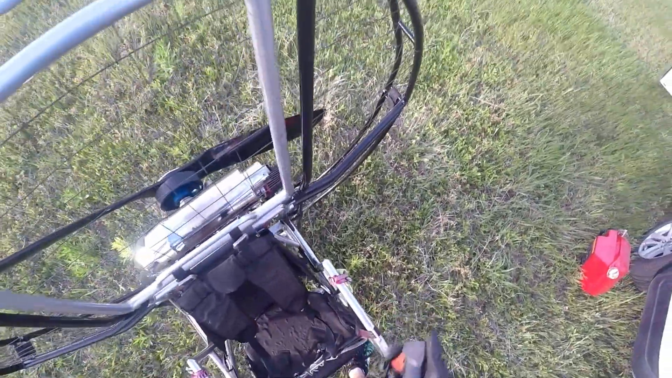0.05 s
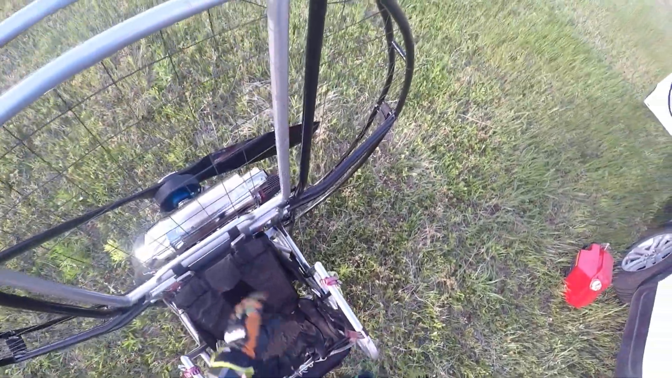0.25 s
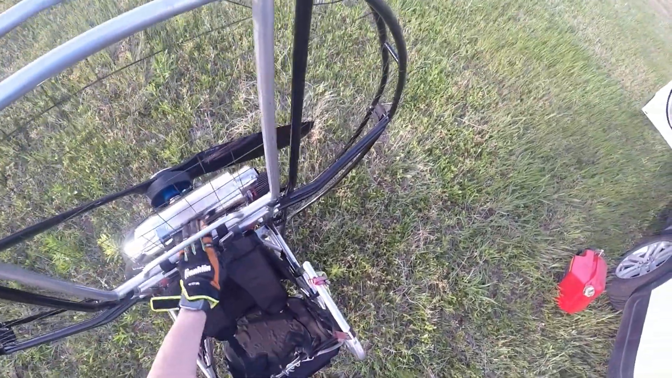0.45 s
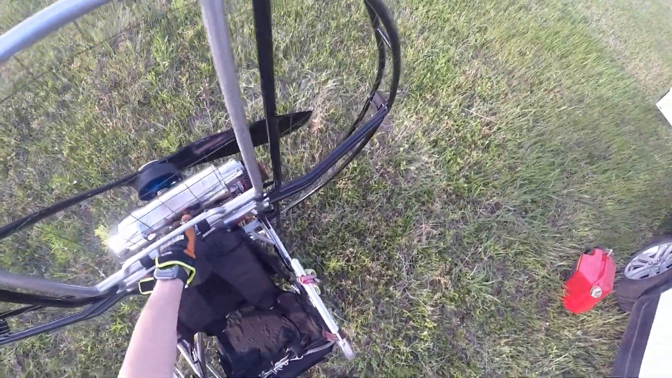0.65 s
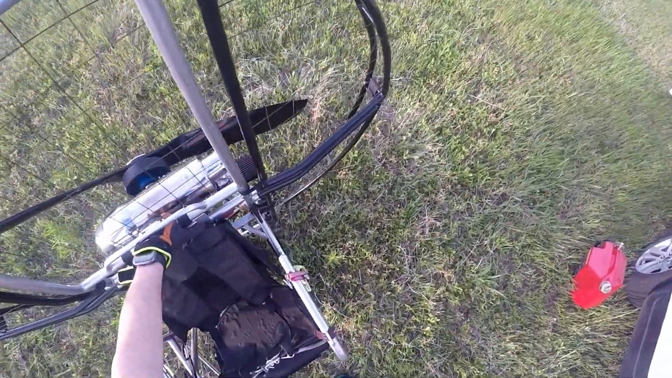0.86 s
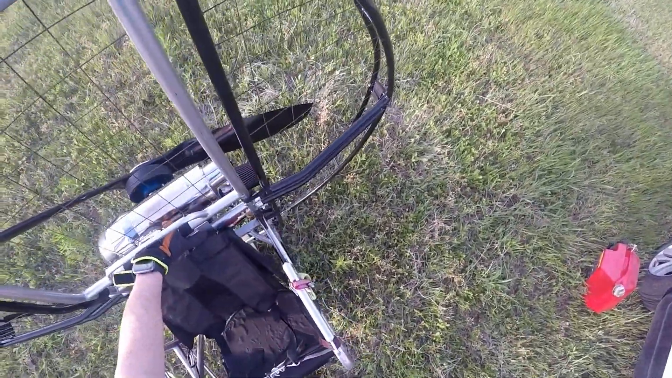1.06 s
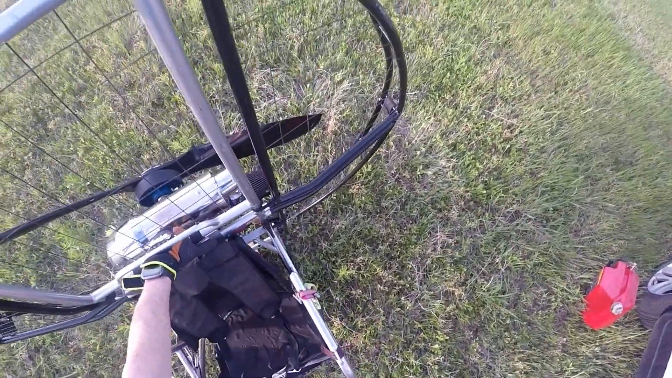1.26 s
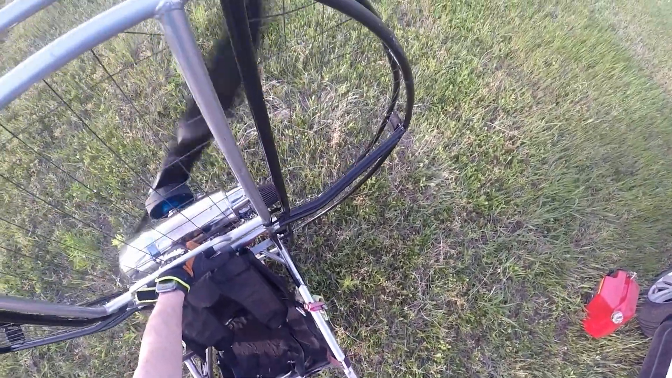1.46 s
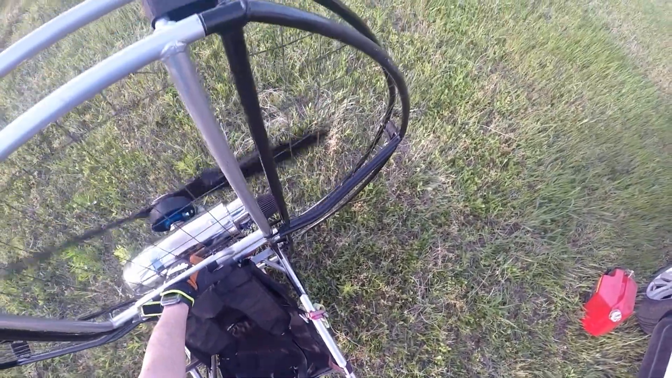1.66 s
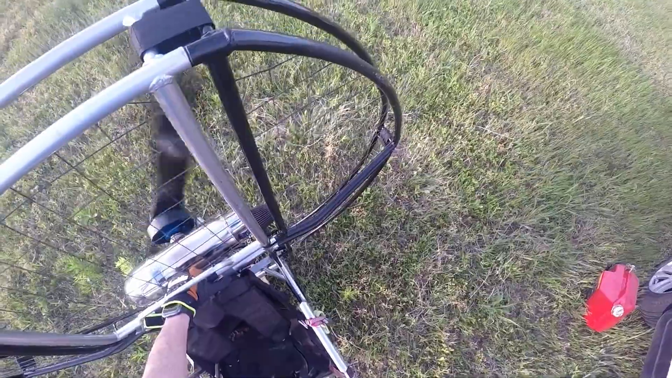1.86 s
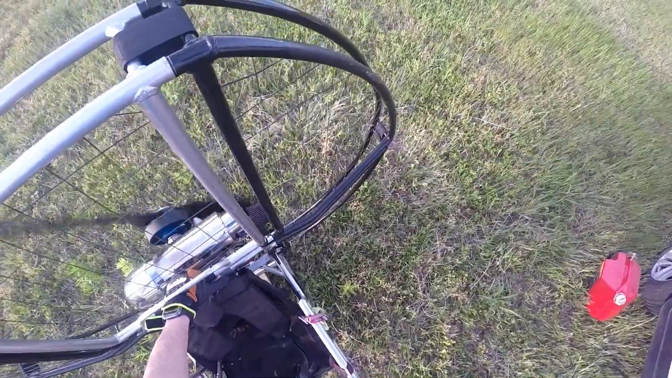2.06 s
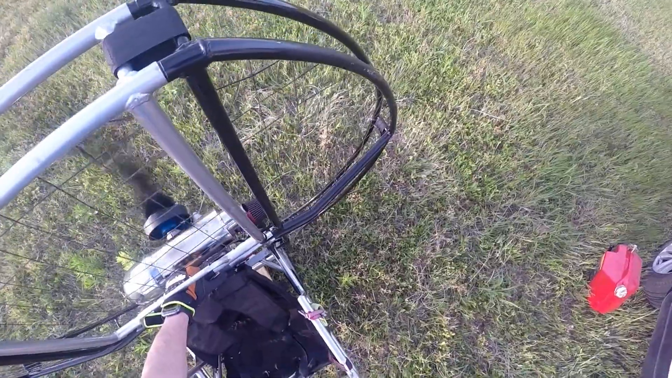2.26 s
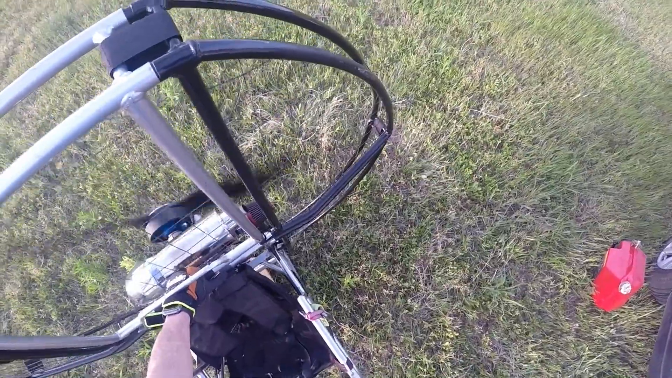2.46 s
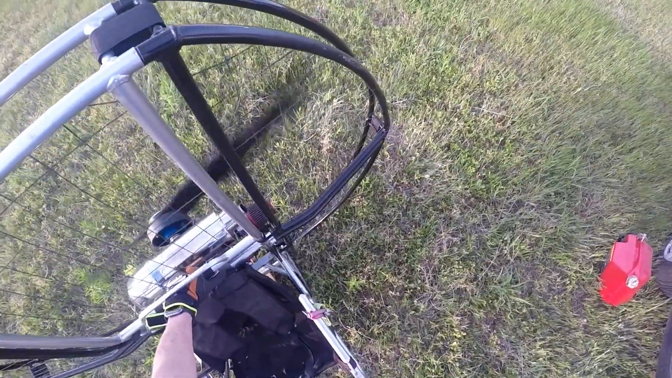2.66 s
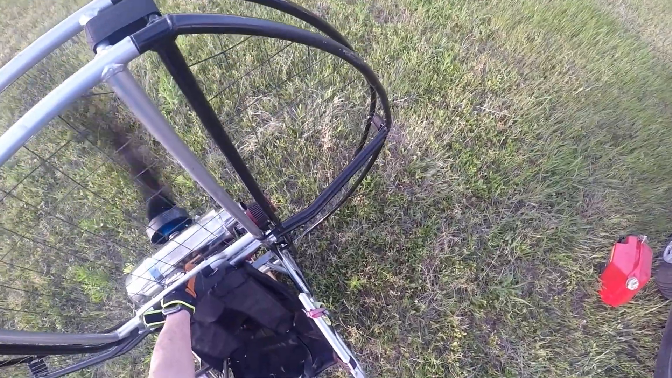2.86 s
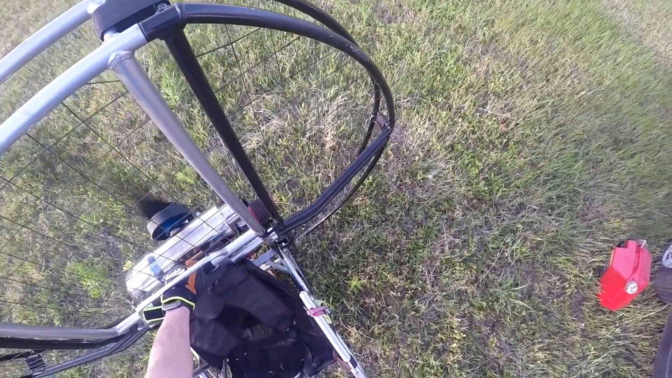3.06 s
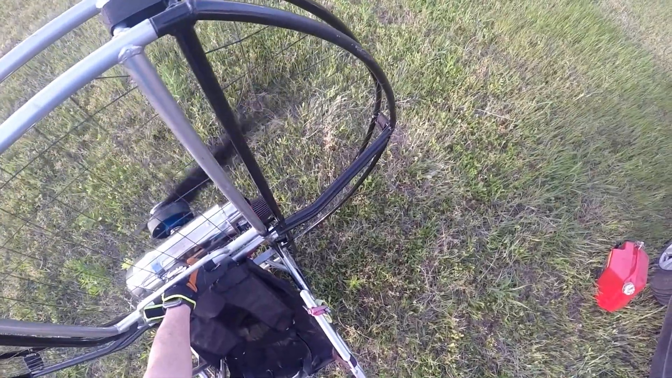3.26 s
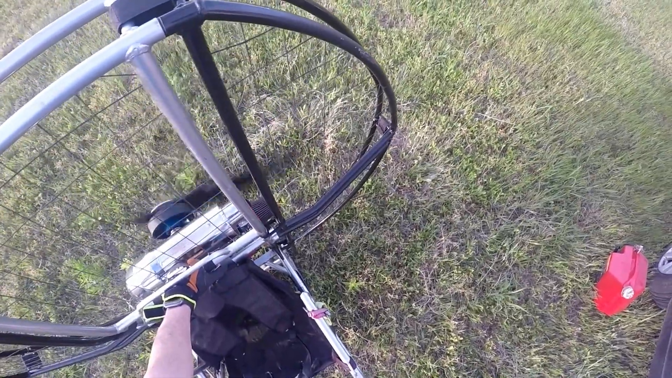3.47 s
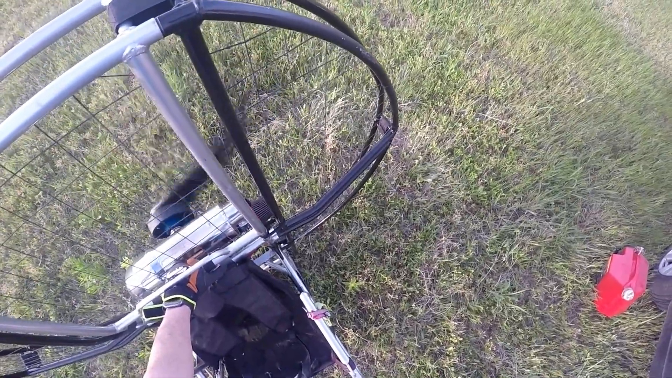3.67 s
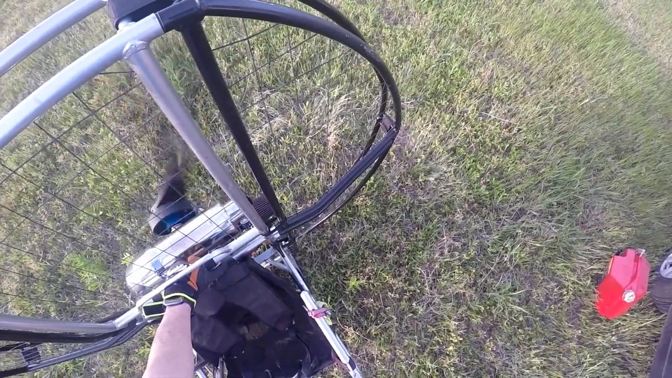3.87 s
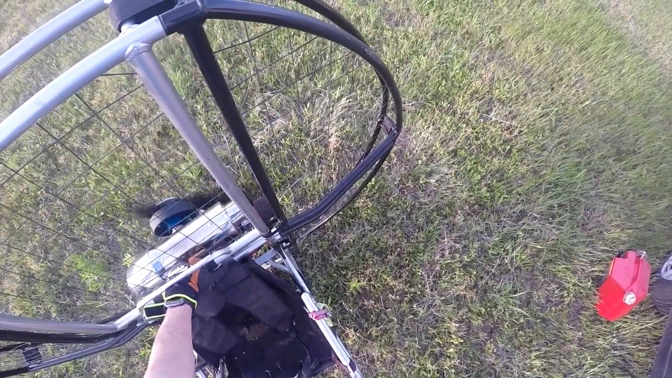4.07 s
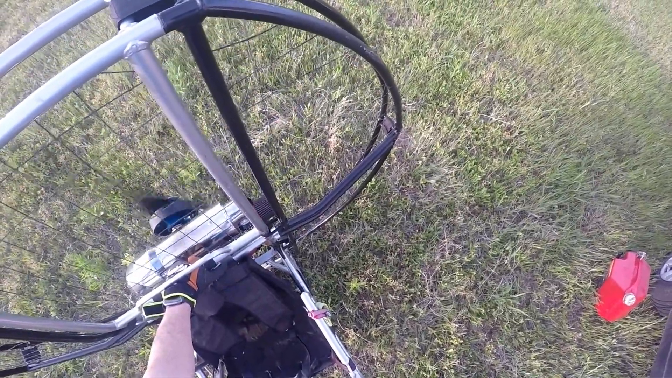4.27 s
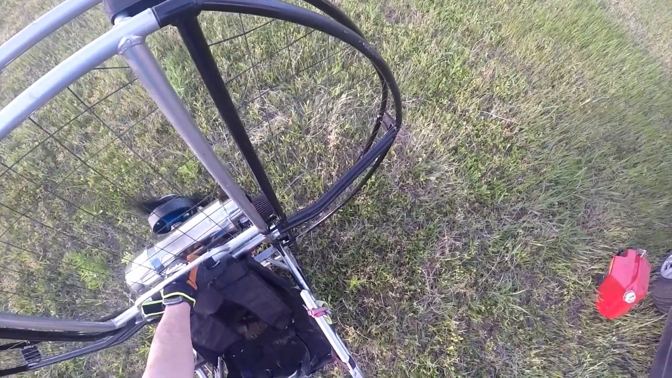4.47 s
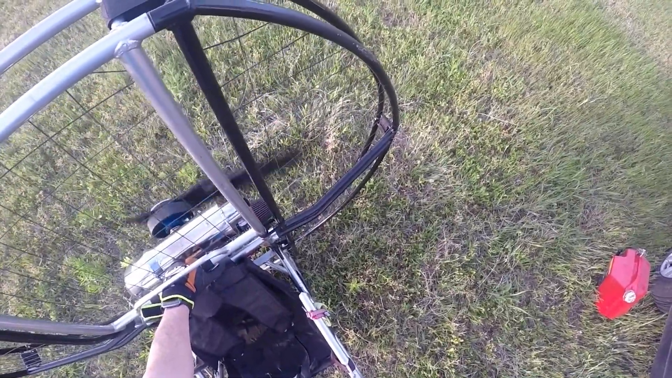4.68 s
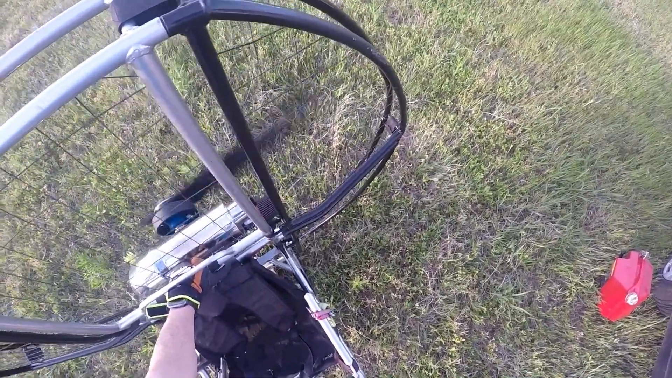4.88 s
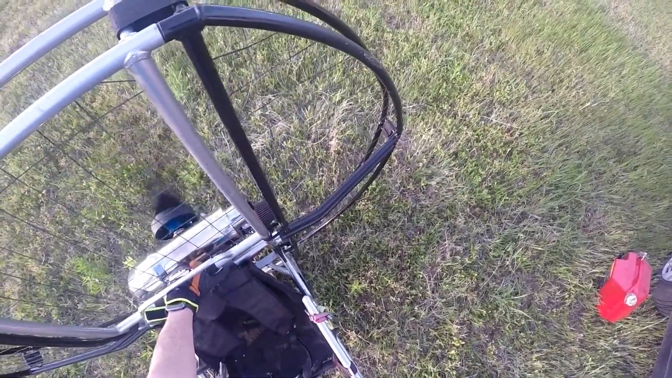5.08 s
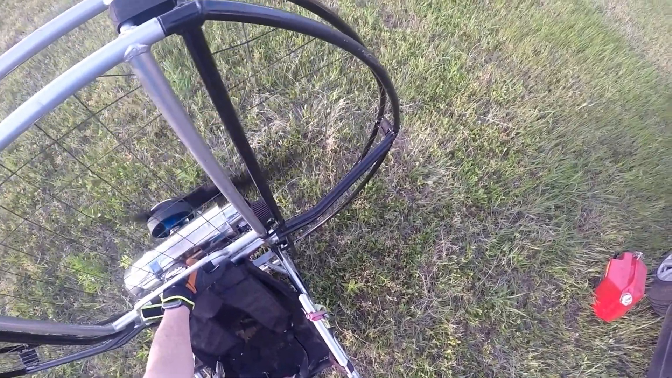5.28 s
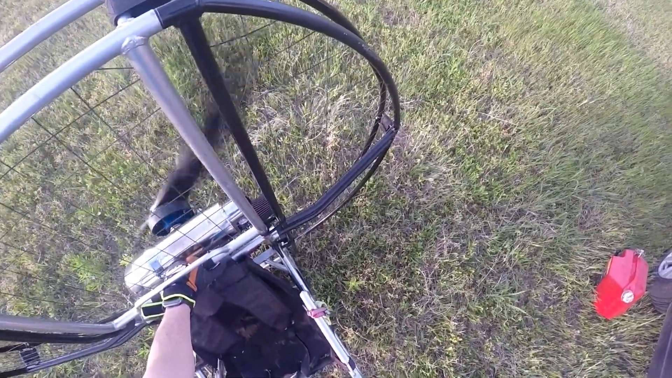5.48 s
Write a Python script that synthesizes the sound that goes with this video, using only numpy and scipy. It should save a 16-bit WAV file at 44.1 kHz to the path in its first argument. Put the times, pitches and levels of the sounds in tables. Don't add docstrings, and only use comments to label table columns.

```python
import sys
import numpy as np
from scipy import signal
from scipy.fft import rfft, irfft
from scipy.io import wavfile
from scipy.ndimage import uniform_filter1d

SR = 44100
rng = np.random.default_rng(int(sys.argv[2]) if len(sys.argv) > 2 else 0)


def volts_from_db(level):
    exponent = np.asarray(level, float) / 20
    return 10 ** exponent


def generate_wav(sig):
    pcm = np.round(np.clip(np.atleast_2d(sig).T, -1, 1) * 32767).astype(np.int16)
    wavfile.write(sys.argv[1], SR, pcm)


N = 243873
T = np.arange(N) / SR
CATCH_S, RELEASE_S = 2.28, 4.5


def unit(x):
    return x / np.sqrt(np.mean(x ** 2))


def white():
    return rng.standard_normal(N)


def wander(samples):
    return unit(uniform_filter1d(white(), size=samples))


def bump(centre_s, half_s):
    return np.exp(-((T - centre_s) / half_s) ** 2)


def curves(table):
    s, *columns = np.transpose(table)
    return [np.interp(T, s, c) for c in columns]


def butter(x, order, hz, kind="low"):
    return signal.sosfilt(signal.butter(order, hz, kind, fs=SR, output="sos"), x)


def ring(x, hz, width_hz):
    return signal.lfilter(*signal.iirpeak(hz, hz / width_hz, SR), x)


def body(x, spectrum, modes=(), under_db=-6):
    hz = np.maximum(np.arange(4097) * SR / 8192, 1)
    at, db = np.transpose(spectrum)
    power = volts_from_db(np.interp(np.log(hz), np.log(at), db) + under_db) ** 2
    for f, width, top_db in modes:
        power = power + volts_from_db(top_db) ** 2 / (1 + (2 * (hz - f) / width) ** 2) ** 2.15
    ceps = irfft(np.log(power) / 2)
    ceps[1:4096] *= 2
    ceps[4097:] = 0
    taps = irfft(np.exp(rfft(ceps)))
    return signal.fftconvolve(x, unit(taps) / np.sqrt(len(taps)))[:N]


def spikes(times, size):
    out = np.zeros(N)
    np.add.at(out, np.clip((np.asarray(times) * SR).astype(int), 0, N - 1), size)
    return out


def fade(x, decay_s, rise_s):
    t = T[:8192]
    return signal.fftconvolve(x, (1 - np.exp(-t / rise_s)) * np.exp(-t / decay_s))[:N]


def grit(rate, spread_db, smear_s):
    size = volts_from_db(spread_db * np.minimum(rng.exponential(size=N), 4.0))
    hits = (rng.random(N) < rate / SR) * size
    return unit(white() * (0.64 + unit(fade(hits, smear_s, 0.00057))))


# time in seconds, speed in turns per second.
SPEED = [(0, 8), (1.6, 9.5), (2.25, 14), (2.3, 20), (3.0, 21), (3.2, 24), (3.35, 29), (3.65, 36),
         (3.95, 37), (4.21, 35), (4.45, 26.5), (4.54, 31.8), (4.84, 24), (4.9, 31), (5.05, 32), (5.21, 40),
         (5.45, 30.7), (5.53, 28.7)]


def crank(fired_s):
    free = np.cumsum(curves(SPEED)[0]) / SR
    at = np.interp(np.sort(fired_s), T, free)
    whole = np.concatenate([[0], np.cumsum(np.round(np.diff(at)))])
    return free + uniform_filter1d(np.interp(free, at, whole - at), size=2000)


def each_turn(turns, offset, scatter_db):
    wraps = np.diff(np.floor(turns - offset), prepend=0) > 0
    return wraps * volts_from_db(scatter_db * white())


# frequency in Hz, level in dB per Hz.
WIND = [(7.1, -38), (12, 2.5), (22, -7.5), (35, -3), (45, -3.5), (54, -11.5), (81, -25), (90, -13.5),
        (120, -61), (200, -120)]
# frequency in Hz, level in dB per Hz.
HISS = [(53, -15.5), (90, -4.5), (168, -11), (264, -16.5), (964, -23.5), (2440, -22), (3370, -25),
        (4090, -23.5), (6570, -31), (7810, -31), (14300, -36.5), (15600, -40)]
# time in seconds, level in dB above the steady rumble.
GUSTS = [(.09, 9), (.17, 5), (.46, 0), (.61, 6), (.74, 5), (.89, 3), (1.02, 0), (1.2, 3), (1.37, 2),
         (1.63, 9.5), (1.99, 9), (2.35, 4.5), (2.48, 7), (2.651, 9), (3.0, 5), (3.3, 7), (3.73, 2),
         (3.8, 8), (3.88, 3), (3.96, 2), (4.22, 7), (4.91, 2), (5.01, -2), (5.22, 8.5), (5.32, 3)]
# time in seconds, level in dB, pitch in Hz.
TICKS = [
    (0.086, -58.5, 2720),
    (.21, -64, 3500),
    (.3, -64, 2040),
    (1.26, -68, 2300),
    (0.564, -69, 181),
    (1.075, -62, 158),
    (2.02, -46.5, 124),
]
WIND_DB, SHAKE_DB_PER_TURN, GUST_HALF_S, HISS_DB = -48, 0.4784, 0.03, -62


def field(extra_speed):
    wind = unit(body(white(), WIND))
    steady = uniform_filter1d(np.abs(wind), size=4000) ** 0.78
    gusts_db = sum(db * bump(s, GUST_HALF_S) for s, db in GUSTS)
    rumble_db = WIND_DB + SHAKE_DB_PER_TURN * (extra_speed - extra_speed[0]) + gusts_db
    ticks = 0
    for s, db, hz in TICKS:
        push = spikes([s], 1.0) * 3000 / hz ** 0.83
        ticks = ticks + volts_from_db(db + 26) * ring(push, hz, hz / 6)
    return unit(wind / steady) * volts_from_db(rumble_db) + volts_from_db(HISS_DB) * body(white(), HISS) + ticks


# centre in seconds, half length in seconds, pitch in Hz, glide in Hz per second, level in dB.
WHINE = [
    (1.449, 0.0064, 1250, 5000, -40),
    (1.54, 0.018, 1380, 10000, -39),
    (1.588, 0.014, 1330, 500, -37),
    (1.572, 0.016, 1800, -6000, -39),
]
# centre in seconds, grind level in dB,
# half length in seconds, mesh pitch in Hz, mesh level in dB.
SURGES = [(1.628, -67, 0.014, 1868, -24.5), (1.686, -32, 0.042, 1958, -31),
          (1.773, -29, 0.035, 2036, -27.5), (1.869, -30.5, 0.029, 1908, -27),
          (1.967, -33.5, 0.035, 1994, -27.5), (2.05, -39, 0.032, 2053, -28.5),
          (2.122, -31.5, 0.017, 2002, -28), (2.211, -36, 0.022, 2012, -27), (2.323, -51, 0.0096, 2005, -28),
          (2.391, -33, 0.013, 1990, -24)]


def whine():
    out, waver = 0, 0.5 * wander(200)
    for s, half, hz, glide_hz, db in WHINE:
        phase = 2 * np.pi * (hz * (T - s) + glide_hz * (T - s) ** 2 / 2) + waver
        tone = np.sin(phase) + 0.93 * np.sin(2 * phase) + 0.33 * np.sin(3 * phase)
        out = out + tone * volts_from_db(db + 2) * bump(s, half)
    for s, _, half, mesh_hz, mesh_db in SURGES:
        phase = 2 * np.pi * mesh_hz * ((T - s) - (T - s) ** 2) + waver
        out = out + volts_from_db(mesh_db) * bump(s, half) * (0.17 * np.sin(phase) + np.sin(2 * phase))
    return out * (1 + 0.12 * wander(120))


# time in seconds, grind level in dB, ring level in dB.
STARTER = [(1.45, -60.5, -60), (2.3, -47, -26.5), (2.5, -43.5, -25.5), (3.0, -42.5, -35.5), (3.6, -41, -26),
           (3.86, -37.5, -27.5), (4.09, -53, -22), (4.22, -64, -33), (4.5, -117, -45)]
# frequency in Hz, level in dB per Hz.
GEARS = [(560, -108), (950, -26), (1890, 2), (2280, -18), (2690, 0.5), (2950, -20), (3650, 11.5),
         (5490, -23), (6030, -34), (7990, -1.5), (11800, -66), (13800, -21), (15600, -90)]
# frequency in Hz, width in Hz, level in dB.
GEAR_MODES = [(1801, 71, -8), (2800, 130, -3), (3258, 67, -1.5), (3630, 33, -2), (4080, 72, 8),
              (4683, 300, 3.5), (5230, 240, -3), (5550, 170, -3), (7690, 55, 2.5), (7460, 60, -10),
              (8000, 33, -13.5), (8360, 66, 0.5), (9150, 370, -9.5), (9770, 690, -13), (10470, 43, -50.5),
              (13500, 400, -12),
              (1364, 370, -7),
    (3500, 29, 10.5),
]
RING_HZ, RING_RISE_HZ_PER_S, RING_TOP_HZ = 3658, 60, 3712
RING_SWELL_DB, RING_BEAT_DB = 3, 3


def starter(turns, beat):
    grind_db, ring_db = curves(STARTER)
    engaged = np.clip((RELEASE_S - T) / 0.03, 0, 1) * (T > 1.44)
    rub = grit(670, 3.36, 0.0027) * beat * volts_from_db(grind_db + 12.5) * engaged
    grind = body(rub, GEARS, GEAR_MODES, under_db=-4.0)
    ring_hz = np.minimum(RING_HZ + RING_RISE_HZ_PER_S * (T - CATCH_S), RING_TOP_HZ)
    ring_db = ring_db + RING_SWELL_DB * wander(2500) + RING_BEAT_DB * np.cos(2 * np.pi * (turns - 0.3))
    tremble = wander(250)
    level = volts_from_db(ring_db - 2.0 + 3.5 * np.roll(tremble, 9000))
    free = engaged * np.clip((T - 2.0) / 0.42, 0, 1)
    return grind + np.sin(2 * np.pi * np.cumsum(ring_hz + 16 * tremble) / SR) * level * free


# time in seconds, level in dB.
ENGINE = [(1.4, -54.5), (1.47, -40), (1.6, -34.5), (1.97, -41), (2.1, -39.5), (2.28, -36), (2.45, -35.5),
          (2.67, -33), (3.04, -33.5), (3.49, -34), (3.65, -33.5), (3.85, -30.5), (4.21, -35), (4.54, -36),
          (4.83, -38.5), (5.15, -32), (5.44, -38.5), (5.53, -36.5)]
# frequency in Hz, level in dB per Hz.
CASE = [(560, -101), (950, -32), (1270, -13.5), (1560, -11.5), (1930, -1), (2220, -17), (2760, -8),
        (3000, -22.5), (3570, -6), (4050, -1), (5940, -38.5), (8610, -28), (15200, -46.5)]
# frequency in Hz, width in Hz, level in dB.
CASE_MODES = [(1942, 267, -2), (2666, 44, -8.5), (3110, 53, -9.5), (3570, 15, 2), (4060, 87, 2),
              (4600, 54, -16), (5460, 94, -29)]


def clatter(effort_db, beat):
    rattle = grit(500, 2.9, 0.0026) * (beat * volts_from_db(effort_db + 1.0) * (T > 1.4))
    labour = sum(volts_from_db(db) * bump(s, half) for s, db, half, _, _ in SURGES)
    strain = body(grit(500, 5.2, 0.0037) * labour, CASE, CASE_MODES, under_db=-6.5)
    return body(rattle, CASE, CASE_MODES, under_db=-2.5) + butter(strain, 2, [1150, 5600], "band")


# time in seconds, level in dB.
PINGS = [(3.975, -5), (4.03, -5), (4.09, 2), (4.185, -5), (4.25, -6), (4.29, -8), (4.38, -20), (4.44, -1),
         (4.61, -9), (4.704, -2), (4.86, -2), (4.905, 7.5), (4.94, -4), (5.1, 2), (5.36, -10), (5.489, -13)]


def impacts(turns, blows, effort_db):
    s, peak_db, treble_db = np.transpose(blows)
    noise = white()
    thud = fade(spikes(s, volts_from_db(peak_db - 11.5)), 0.013, 0.0017)
    snap = fade(spikes(s + 0.00095, volts_from_db(peak_db - 9.5)), 0.0017, 0.00047)
    blow = butter(body(noise * (thud + snap), CASE, CASE_MODES, under_db=-3), 2, 6500)
    slap = each_turn(turns, 0.8, scatter_db=7) * volts_from_db(effort_db - 20.5) * (T > CATCH_S)
    spray = noise * fade(slap + spikes(s, volts_from_db(peak_db + treble_db - 9.5)), 0.018, 0.00089)
    fins = 2.4 * ring(spray, 11100, 45) * np.clip(T - 2.8, 0.25, 1)
    fins = fins + 1.2 * ring(spray, 6650, 90) + ring(spray, 8350, 120)
    spray = butter(ring(spray, 4800, 3500) + fins, 3, 5200, "high")
    ping_s, ping_db = np.transpose(PINGS)
    return blow + spray + ring(spikes(ping_s, volts_from_db(ping_db - 0.5)), 10120, 35)


def metal(turns, blows):
    effort_db = curves(ENGINE)[0]
    beat = volts_from_db(1.02 * np.cos(2 * np.pi * (turns - 0.2)) + 0.12 * np.cos(4 * np.pi * (turns - 0.1)))
    return starter(turns, beat) + clatter(effort_db, beat) + impacts(turns, blows, effort_db)


# multiple of crank speed, level in dB.
ORDERS_DB = [(5, -7), (6, -2.5), (8, -22), (10, -6)]
# multiple of crank speed, level in dB.
WHIRR_DB = [(9, -8.5), (10, -8), (11, -3), (13, -5), (14, -2), (15, -6.5), (17, -6), (18, -9.5)]


def intake(turns, level_db):
    gulp = butter(each_turn(turns, 0.45, scatter_db=1) + 0.005 * white(), 2, 320)
    box = ring(ring(gulp, 182, 35.0), 228, 57) + 0.52 * ring(gulp, 99, 105)
    hum = sum(volts_from_db(db) * np.sin(2 * np.pi * k * (turns - 0.3)) for k, db in ORDERS_DB)
    hum = ring(hum, 212, 45)
    fan = np.sin(14 * np.pi * turns) * np.clip((curves(SPEED)[0] - 21) / 8, 0, 1)
    fan = fan * np.interp(T, [5.19, 5.27, 5.42, 5.5], [1, 0.3, 0.3, 1])
    whirr = 0
    for k, db in WHIRR_DB:
        whirr = whirr + volts_from_db(db + 3.8 * wander(3000)) * np.sin(2 * np.pi * k * turns + k * k)
    fan = fan + volts_from_db(-13) * whirr * np.clip((T - 3.2) / 0.2, 0, 1)
    shake = np.sin(2 * np.pi * turns) + 1.4 * ring(gulp, 66, 50) * volts_from_db(47) * (T < CATCH_S)
    return volts_from_db(level_db) * (volts_from_db(58) * box + volts_from_db(4.5) * hum + volts_from_db(6.5) * fan + volts_from_db(1.0) * shake)


# frequency in Hz, width in Hz, level in dB.
PIPE = [(216, 115, 6), (312, 296, 7), (559.5, 34, 4.5), (773, 51, -9.5), (1090, 90, -14)]
RICH_GAP_S = 0.045


def exhaust(turns, pops, puff_db):
    s, peak_db = np.transpose(pops)
    missed = uniform_filter1d(spikes(s, 1.0), size=600) < 1e-9
    puff = butter(each_turn(turns, 0.062, scatter_db=1.0) * volts_from_db(puff_db + 39.5) * missed, 4, 600)
    pop = spikes(s + 0.001875, volts_from_db(peak_db + 32.5))
    push = pop + puff
    push = push + 0.24 * np.roll(push, int(0.0056 * SR))
    pipe = sum(volts_from_db(db) * ring(push, hz, width) * (-1) ** k for k, (hz, width, db) in enumerate(PIPE))
    pipe = pipe + 1.36 * ring(push, 134, 36) + 0.35 * ring(pop, 704, 147)
    gas = ring(white(), 490, 400) * fade(puff + 0.24 * pop, 0.033, 0.002) * volts_from_db(-44)
    order = np.argsort(s)
    rich = np.diff(s[order], prepend=0) > RICH_GAP_S
    crack = ring(spikes(s[order] + 0.00198, rich * volts_from_db(peak_db[order] + 30)), 795, 154)
    flow = ring(white(), 430, 90) * volts_from_db(puff_db - 5)
    return crack + flow + pipe + gas


# first in seconds, last in seconds, number of firings.
RUNS = [(2.287, 2.335, 2), (2.435, 3.008, 5), (3.1, 3.268, 3), (3.343, 3.536, 4), (3.377, 3.504, 3),
        (3.566, 3.623, 3), (3.681, 3.681, 1), (3.732, 3.948, 5), (4.001, 4.087, 2), (4.203, 4.203, 1),
        (4.465, 4.529, 2), (4.854, 4.854, 1), (4.888, 4.921, 2), (4.983, 5.046, 2), (5.077, 5.077, 1),
        (5.107, 5.162, 3), (5.187, 5.187, 1), (5.215, 5.215, 1)]
# pop in dB, blow in dB, treble in dB, lag of the blow in seconds.
RUN_FORCE = [(-31.5, -11, -5, -0.0088), (-30, -10.5, -4.5, -0.0062), (-28.5, -8, -10, -.004),
             (-28, -9, -8.5, -0.0028), (-30, -15, -25, -0.0061), (-26, -12, -13, -0.0011),
             (-23.5, -8.5, -8, -0.0079), (-24, -5.5, -9.5, .003), (-25, -14, -31, -.003),
             (-28, -6, -10.5, 0.0028), (-25, -5, -15, 0.0017), (-29, -8, -12, .002),
             (-27.5, -13, -18, 0.0013), (-27.5, -10.5, -12.5, -0.00038), (-28, -25, -2, -0.0039),
             (-26.5, -11.5, -16, -.001), (-23.5, -10, -11.5, -0.00071), (-27.5, -32, -14, 0.048)]
POP_SCATTER_DB, BLOW_SCATTER_DB = 1.75, 0.5


def firings():
    free = np.cumsum(curves(SPEED)[0]) / SR
    rows = []
    for (first, last, n), force in zip(RUNS, RUN_FORCE):
        angles = np.linspace(*np.interp([first, last], T, free), int(n))
        rows += [(s, *force) for s in np.interp(angles, free, T)]
    rows = np.array(rows)
    rows[:, 1:3] += rng.standard_normal((len(rows), 2)) * [POP_SCATTER_DB, BLOW_SCATTER_DB]
    return rows


# time in seconds, peak level in dB, treble level in dB.
KNOCKS = [(1.4382, -12.5, -12.5), (1.6692, -13.5, -33), (1.8573, -28, -36), (1.9386, -21, -32),
          (2.0212, -15, -36), (2.1194, -11.5, -38), (2.2575, -20, -34), (2.3747, -15, -14),
          (2.4702, -11.5, -28), (2.623, -16, -7), (2.9026, -35, -19), (3.0465, -24, -15),
          (5.2596, -19, -11.5), (5.314, -20, -9), (5.3413, -21, -38), (5.3958, -19.5, -40)]
# time in seconds, thump level in dB.
SQUEEZES = [
    (1.626, -51),
    (1.725, -47),
    (1.898, -46),
    (2.147, -48.5),
]
IDLE_TURNS_PER_S = 25
INTAKE_DB, INTAKE_CRANKED_DB, INTAKE_DB_PER_TURN = -47, -9.5, -0.2939
PUFF_DB, PUFF_DB_PER_TURN = -48.5, 0.5


def scene():
    fired = firings()
    pops = np.vstack([SQUEEZES, fired[:, :2]])
    fired_blows = np.column_stack([fired[:, 0] + fired[:, 4], fired[:, 2:4]])
    blows = np.vstack([KNOCKS, fired_blows])
    turns, extra = crank(pops[:, 0]), curves(SPEED)[0] - IDLE_TURNS_PER_S
    intake_db = INTAKE_DB + np.where(T < CATCH_S, INTAKE_CRANKED_DB, INTAKE_DB_PER_TURN * extra)
    engine = exhaust(turns, pops, PUFF_DB + PUFF_DB_PER_TURN * extra) + intake(turns, intake_db)
    return (field(extra) + whine() + metal(turns, blows) + (T > 1.45) * engine)[None]


def band_limit(x):
    return signal.sosfilt(signal.butter(12, 15710, fs=SR, output="sos"), x)


def record(dry):
    top_cut = signal.ellip(10, 0.3, 50, 15330, fs=SR, output="sos")
    mix = signal.sosfilt(top_cut, dry)
    return band_limit(mix)


dry = scene()
out = record(dry)
generate_wav(out)
```